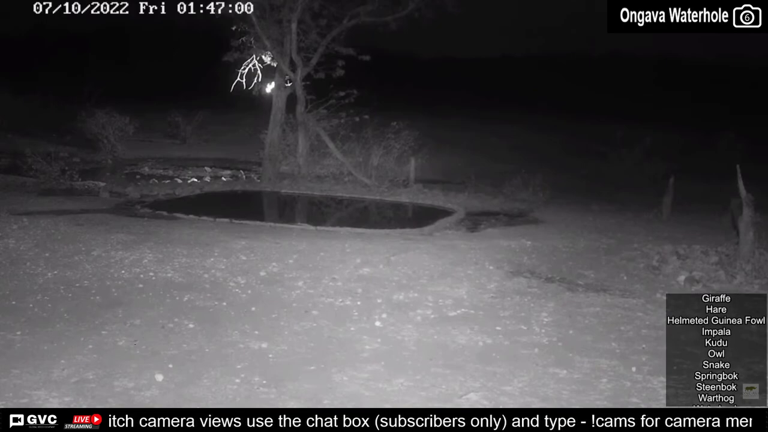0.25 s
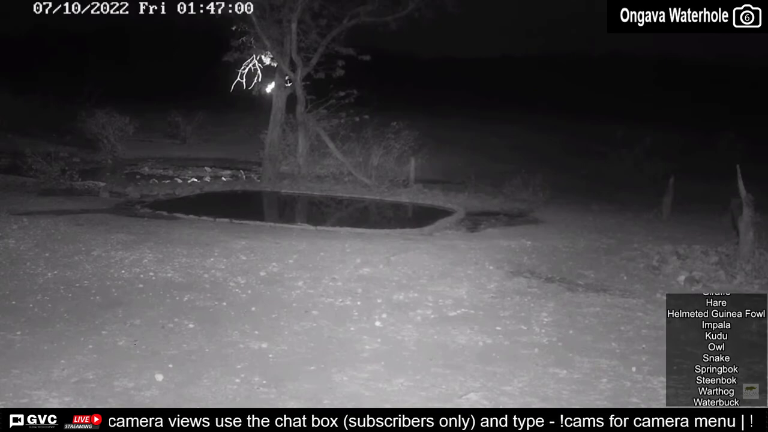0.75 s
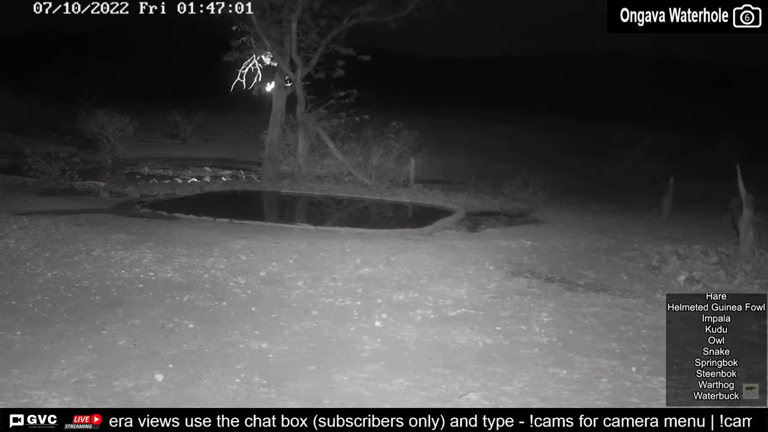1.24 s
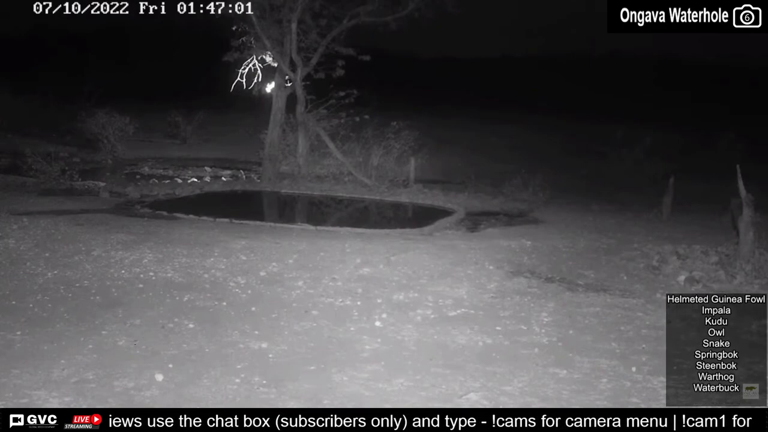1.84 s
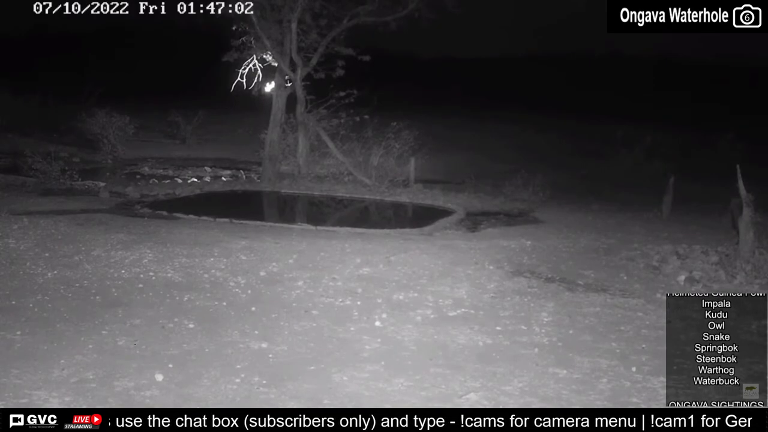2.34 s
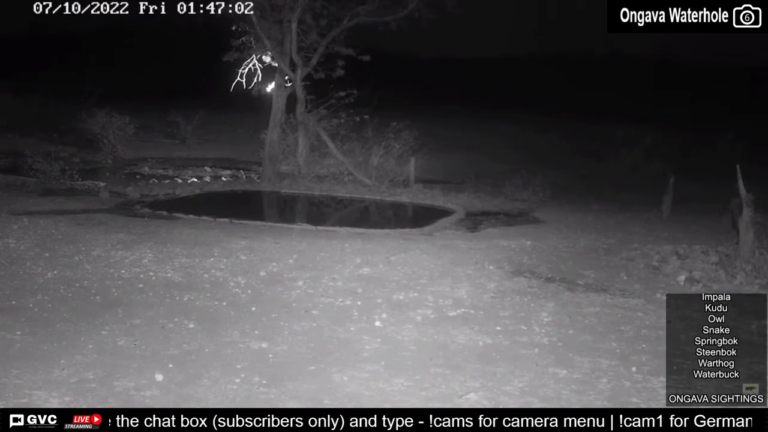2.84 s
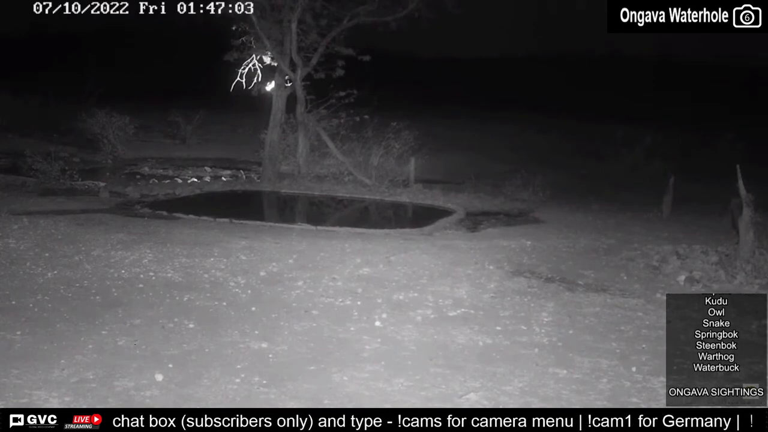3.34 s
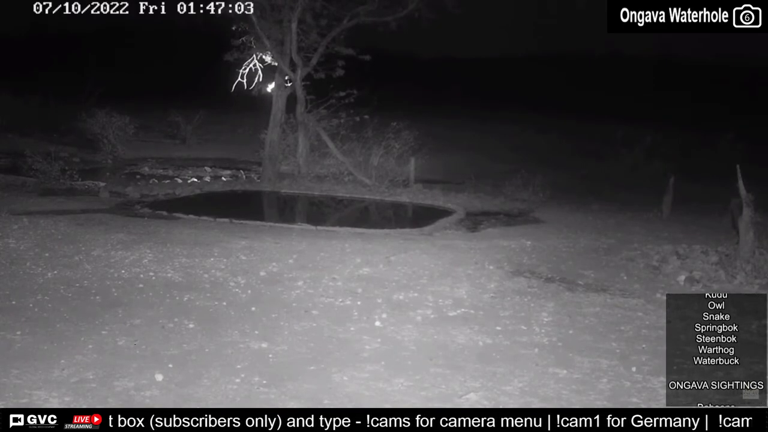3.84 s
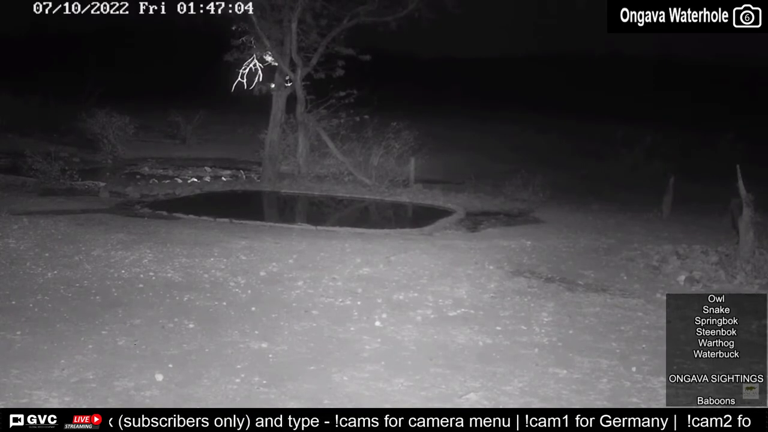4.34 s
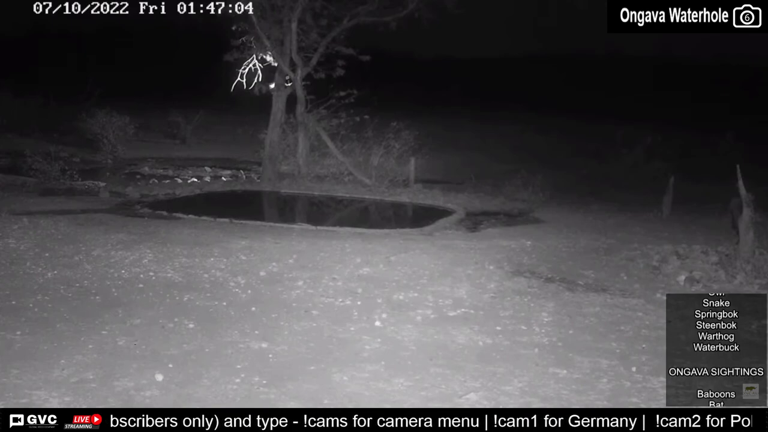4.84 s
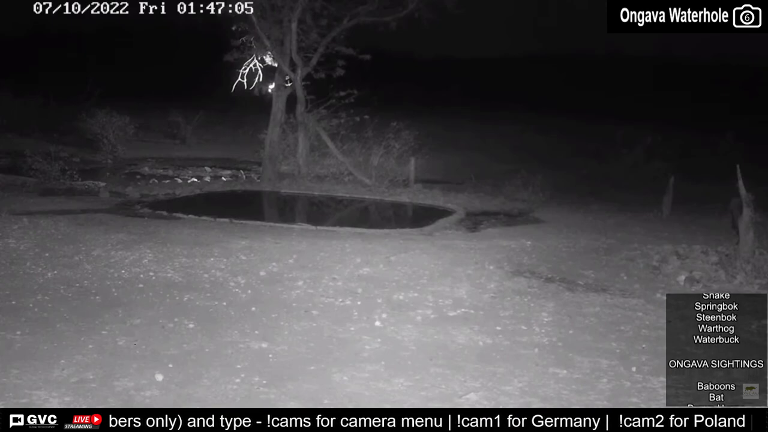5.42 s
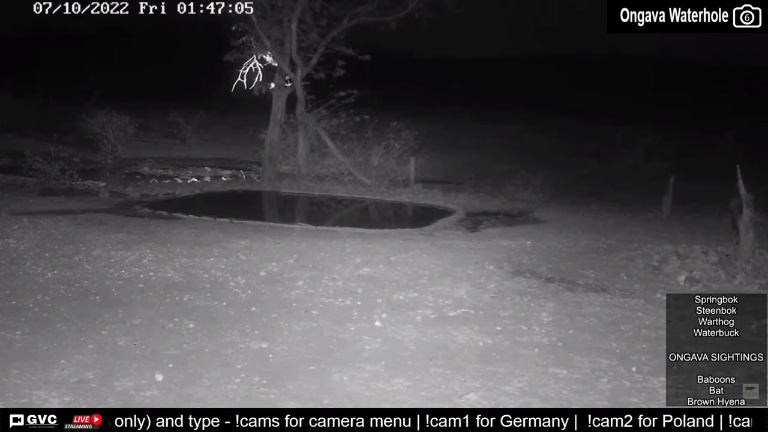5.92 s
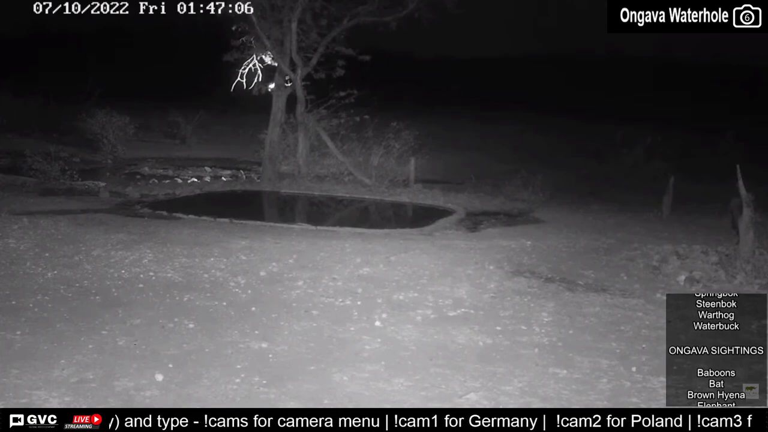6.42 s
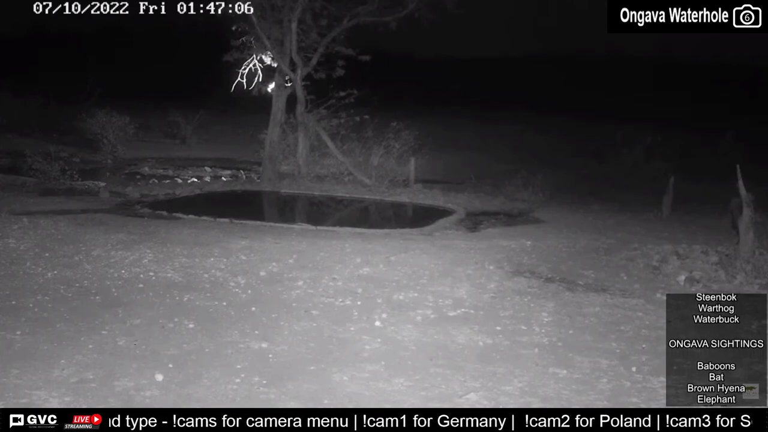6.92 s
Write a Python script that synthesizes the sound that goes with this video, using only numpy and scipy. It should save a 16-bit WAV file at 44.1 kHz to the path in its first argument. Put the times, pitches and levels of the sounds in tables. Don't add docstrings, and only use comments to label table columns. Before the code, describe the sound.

Steady night insect chorus by a pool: continuous purring trill, soft paired chirps about every 0.6 seconds, thin high buzzing and gentle hiss.

```python
import sys
import numpy as np
from scipy import signal
from scipy.fft import rfft, irfft
from scipy.io import wavfile
from scipy.ndimage import uniform_filter1d

SR = 44100
rng = np.random.default_rng(int(sys.argv[2]) if len(sys.argv) > 2 else 0)


def transcribe(u):
    v = np.clip(np.atleast_2d(u).T, -1, 1)
    q = np.round(v * 32767).astype(np.int16)
    wavfile.write(sys.argv[1], SR, q)


def makeup_ratio(level_db):
    decades = np.asarray(level_db, float) / 20
    return 10 ** decades


N = 316312
T = np.arange(N) / SR
END_S = 7.2
FAR_ECHO_DB = -12


def curve(table, column=1):
    points = np.array(table)
    return np.interp(T, points[:, 0], points[:, column])


def walk(rate):
    k = int(SR / rate)
    held = np.repeat(rng.standard_normal(N // k + 1), k)
    return 1.62 * uniform_filter1d(uniform_filter1d(held, k), k)[:N]


def coloured(points, noise, column=1):
    points = np.array(points)
    log_hz = np.log(np.arange(N // 2 + 1) * SR / N + 1)
    db = np.interp(log_hz, np.log(points[:, 0]), points[:, column], left=-200, right=-200)
    return irfft(rfft(noise) * makeup_ratio(db), N) * np.sqrt(SR / 2)


def strokes(mids, db, hz, fall_hz, length, lean=1., blunt=0.8, overtone_db=-60,
            scatter_db=1.5, scatter_hz=15, jitter=.0005):
    out, pad = np.zeros(N + 2 * SR), SR
    u = np.arange(int(length * SR)) / (length * SR)
    shape = np.abs(np.sin(np.pi * u ** lean)) ** blunt
    chance = rng.standard_normal((len(mids), 4))
    for mid, d, f, c in zip(*np.broadcast_arrays(mids, db, hz), chance):
        glide_hz = f + scatter_hz * c[0] - fall_hz * (u ** 2 - 1 / 3)
        phase = 2 * np.pi * np.cumsum(glide_hz) / SR + 9 * c[1]
        tone = np.sin(phase) + makeup_ratio(overtone_db) * (1 - u) ** 2 * np.sin(2 * phase)
        i = pad + int((mid + jitter * c[2] - length / 2) * SR)
        out[i:i + len(u)] += makeup_ratio(d + scatter_db * c[3]) * shape * tone
    return out[pad:pad + N]


def place(x, left_db, right_db, wet_db, t60=0.34):
    t = np.arange(int(.4 * SR)) / SR
    tail = rng.standard_normal((2, len(t))) * np.exp(-np.log(1000) * t / t60)
    tail /= np.sqrt(np.sum(tail ** 2, axis=1, keepdims=True))
    wet = signal.fftconvolve(x[None], tail, axes=1)[:, :N]
    return (x + makeup_ratio(wet_db) * wet) * makeup_ratio(np.array([[left_db], [right_db]]))


def mole_cricket():
    # t/s, wing strokes so far, level/dB
    trill = [(0.0197, 1, -43), (0.4847, 25, -42.5), (0.7179, 37, -41.8), (1.1858, 61, -42.3),
             (1.8899, 97, -43.2), (2.3573, 121, -42.7), (3.5268, 181, -42.4), (3.996, 205, -43.8),
             (4.6989, 241, -42.6), (5.8692, 301, -42.7), (7.0411, 361, -42.7)]
    s, turns, db = np.transpose(trill)
    rate = (turns[-1] - turns[0]) / (s[-1] - s[0])
    k = np.arange(0, int(N / SR * rate) + 2)
    known_turns = np.r_[0, turns, turns[-1] + rate]
    known_s = np.r_[s[0] - 1 / rate, s, s[-1] + 1]
    mids = np.interp(k, known_turns, known_s) - .0003
    song = strokes(mids, np.interp(mids, s, db) + 4.0, 2547.5, 216, length=.0128, lean=1.35, blunt=.75,
                   scatter_db=1., scatter_hz=10, jitter=.0003)
    left = strokes(np.arange(.005, END_S, .0205), -60, 2820, 200, .016,
                   scatter_db=2, scatter_hz=50, jitter=.002)
    right = strokes(np.arange(.009, END_S, .0187), -54.8, 2750, 220, .016,
                    scatter_db=2, scatter_hz=60, jitter=.002)
    far = place(left, .1, -11, FAR_ECHO_DB) + place(right, -6, 0.11, FAR_ECHO_DB)
    return place(song, -1.54, 1.74, -13.5, t60=0.12) + far


def tree_crickets():
    chirp_strokes = [0, .028, .063, .091, .119, .154, .182, .21]
    # t/s, level/dB
    lead_chirps = [(.275, -39.5), (.888, -42.5), (1.484, -40), (2.068, -39), (2.686, -39), (3.27, -39.5),
                   (3.888, -38.5), (4.486, -39.5), (5.108, -39), (5.717, -38), (6.313, -39.5), (6.9, -40)]
    # t/s, level/dB
    answer_chirps = [(.328, -39), (.926, -40.5), (1.5, -44.5), (2.079, -39), (2.699, -38), (3.313, -38.5),
                     (3.949, -39.5), (4.555, -41), (5.135, -39), (5.748, -38.5), (6.379, -42),
                     (6.96, -41.5)]
    # t/s, level/dB
    far_swells = [(0., -48.5), (.42, -43), (.96, -44), (1.6, -42.5), (2.12, -46), (2.75, -40.5),
                  (3.27, -42.5), (3.82, -43), (4.11, -45), (4.47, -44), (4.8, -46), (5.06, -43.5),
                  (5.7, -46), (6.33, -43.5), (6.92, -42)]
    murmur_db, swell_s = -49, 0.07

    grid = np.array(chirp_strokes) + .012
    effort_db = np.interp(grid, [.012, .08, .22], [-2.5, .3, .1])
    near = 0
    for chirps, hz, fall_hz, overtone_db in ((lead_chirps, 1995, 168, -4.5), (answer_chirps, 1955, 142, -18)):
        s, db = np.transpose(chirps)
        mids = (s[:, None] + grid).ravel()
        near = near + strokes(mids, (db[:, None] + effort_db).ravel(), hz, fall_hz, .025,
                              overtone_db=overtone_db)

    s, db = np.transpose(far_swells)
    group = 0
    for hz, period_s in ((1990, .0298), (2010, .0312), (1965, .033), (2005, .0287)):
        mids = np.arange(0, END_S, period_s)
        swell_db = np.exp(-((mids[:, None] - s) / swell_s) ** 2 / 2) @ (db - murmur_db)
        group = group + strokes(mids, murmur_db + swell_db - 5, hz, 152, .024, scatter_db=2.0, jitter=.003)
    return place(near, -44, 0.091, -8.5, t60=0.087) + place(group, -0.079, -45, FAR_ECHO_DB)


def field_crickets():
    # t/s, level/dB
    chirps_of_three = [(.321, -56), (.704, -54), (1.098, -52), (1.521, -58), (1.972, -53.5), (2.36, -53),
                       (2.774, -55), (3.191, -51.5), (3.617, -55), (4.031, -54), (4.485, -56.5),
                       (4.984, -51.5), (5.54, -52), (6.038, -56), (6.445, -54), (6.838, -51.5)]
    # t/s, level/dB
    chirps_of_four = [(-.178, -55), (.187, -53), (.553, -53), (.915, -53), (1.262, -54.5), (1.61, -54),
                      (1.958, -54.5), (2.313, -52.5), (2.664, -54.5), (3.015, -57), (3.382, -53),
                      (3.752, -57), (4.12, -53.5), (4.478, -54), (4.84, -56), (5.187, -53), (5.56, -55),
                      (5.915, -56), (6.281, -52.5), (6.635, -59), (6.98, -55.5)]
    s, db = np.transpose(chirps_of_three)
    mids = s[:, None] + .057 * np.arange(3)
    stroke_db = db[:, None] + [-3.5, -1, -.2]
    threes = strokes(mids.ravel(), stroke_db.ravel(), 4345, 200, .022, blunt=.7)

    s, db = np.transpose(chirps_of_four)
    mids = s[:, None] + .062 * np.arange(4) - .006
    stroke_db = db[:, None] + [-4, -1, -.5, -.5]
    fours = strokes(mids.ravel(), stroke_db.ravel(), 3660, 400, .032, blunt=.6, jitter=.002)

    ticks = np.arange(.046, END_S, .07135)
    ticks_db = np.where((ticks > 2.4) & (ticks < 5.5), -55, -60)
    high = strokes(ticks, ticks_db, 6620, 250, .02, scatter_db=3, scatter_hz=80, jitter=.003)
    low = strokes(np.arange(.045, END_S, .0513), -64.5, 1698, 70, .022, scatter_db=3.5, jitter=0.002116)
    return (place(threes, .5, -3, FAR_ECHO_DB) + place(fours, -1.5, -7, FAR_ECHO_DB)
            + place(high, -10, .5, FAR_ECHO_DB) + place(low, -1.5, .5, FAR_ECHO_DB))


def water():
    # t/s, peak level/dB, f/Hz
    low_blips = [(.37, -62, 740), (.622, -62, 730), (.676, -60, 800), (.919, -60.5, 690), (1.071, -63, 690),
                 (1.586, -56.5, 720), (1.783, -61, 670), (1.88, -57.5, 720), (1.924, -56, 720),
                 (2.045, -58, 704), (2.113, -56.5, 650), (2.727, -60, 720), (2.781, -61.5, 684),
                 (3.18, -62, 754), (3.722, -58, 843), (4.48, -62, 760), (4.612, -61.5, 607),
                 (4.665, -53, 714), (4.779, -60, 640), (5.259, -55, 760), (5.634, -57, 790),
                 (6.157, -59.5, 710), (6.254, -62, 766), (6.678, -51, 720), (7.127, -59, 772)]
    # t/s, peak level/dB, f/Hz
    high_blips = [(.003, -57, 1200), (.282, -59, 1150), (.71, -59, 1125), (.945, -59, 1300),
                  (1.314, -59, 1144), (1.873, -60, 1090), (2.094, -62, 1260), (2.42, -59.5, 1116),
                  (2.864, -56, 1240), (2.899, -59, 1130), (3.073, -61, 1290), (3.21, -55.5, 1260),
                  (3.883, -60, 1210), (3.938, -63, 1250), (4.344, -59, 1240), (4.421, -59, 1220),
                  (4.552, -60, 1270), (4.664, -58, 1150), (4.916, -61, 1290), (5.023, -60, 1190),
                  (5.609, -63, 1200), (6.121, -58.5, 1315), (6.519, -57, 1270), (6.634, -59, 1360),
                  (7.035, -59, 1180)]
    # t/s, peak level/dB, f/Hz
    deep_blips = [
        (3.57, -60, 563),
        (3.72, -68, 523),
        (3.87, -68, 510),
        (4.01, -62.5, 430),
        (4.249, -64, 530),
        (4.67, -62, 521),
        (4.76, -66, 510),
    ]
    low = strokes(*np.transpose(low_blips), -94, 0.01984, scatter_hz=6.9, scatter_db=2.3)
    low += strokes(*np.transpose(deep_blips), -63, .03, lean=0.6, scatter_hz=5.0, scatter_db=2.0)
    high = strokes(*np.transpose(high_blips), -120, .018, lean=0.97, scatter_hz=3.5, scatter_db=0.7)
    high += strokes([4.732], -48, 3300, 600, .003)
    faint = np.arange(.1, END_S, .22)
    low += strokes(faint, -63, 717, -90, 0.01993, scatter_hz=55, scatter_db=1.3, jitter=.07)
    high += strokes(faint, -63, 1220, -120, .018, scatter_hz=55, scatter_db=1.3, jitter=.07)
    return place(low, -0.4, 0.33, FAR_ECHO_DB) + place(high, -1.6, 1.6, FAR_ECHO_DB)


def katydids():
    # t/s, level/dB
    effort = [(0, -51.7), (.4, -51.5), (.85, -50), (1.2, -51), (1.8, -51), (2.8, -52), (3, -50),
              (3.3, -52.5), (4.05, -53.3), (4.4, -49.5), (4.7, -51.5), (5, -52.9), (5.6, -51), (6.4, -51),
              (7.17, -52)]
    # f/Hz, left level/dB, right level/dB
    buzz = [(6660, -34, -18), (7110, -7, -7), (7430, -7.5, 2.5), (8640, -2.5, -4), (8650, -5, -3),
            (10200, -1, -1), (11400, -0.6, -0.5), (12400, -5, -10), (13640, -9, -11), (14400, -14.5, -15),
            (15300, -16, -10)]
    # middle t/s, half length/s, rise/dB
    right_rasps = [
        (5.725, .04, 4.5),
        (5.835, .04, 7),
    ]
    rasp = np.array([coloured(buzz, rng.standard_normal(N), column=c) for c in (1, 2)])
    slow_phase = 2 * np.pi * np.cumsum(86 + 1.43 * walk(3.2)) / SR
    fast_phase = 2 * np.pi * np.cumsum(171 + 3 * walk(3)) / SR
    teeth = 1 + 0.1 * np.sin(slow_phase) + 0.14 * np.sin(fast_phase)
    left_db = curve(effort)
    right_db = -62.5 + .3 * (left_db - left_db.mean()) + .4 * walk(1.5)
    for s, half_s, rise_db in right_rasps:
        right_db = right_db + rise_db * np.exp(-((T - s) / half_s) ** 2)
    db = np.array([side + 0.5 + .6 * walk(9) for side in (left_db, right_db)])
    return rasp / rasp.std(axis=1, keepdims=True) * teeth * makeup_ratio(db)


def air_hiss():
    # f/Hz, left level/dB per Hz, right level/dB per Hz
    air = [(40, -101, -95), (70, -92.5, -99), (153, -96.5, -94), (376, -99, -99), (530, -99, -99),
           (720, -93, -91.5), (980, -100, -99), (1150, -95, -93), (1460, -99, -96.5), (2490, -84, -82),
           (2980, -99.5, -86.5), (3540, -110, -110)]
    shared, own = rng.standard_normal(N), rng.standard_normal((2, N))
    shared = signal.sosfilt(signal.butter(1, 350, "high", fs=SR, output="sos"), shared)
    like = 0.58
    sides = []
    for c in range(2):
        noise = np.sqrt(like) * shared + np.sqrt(1 - like) * own[c]
        sides.append(coloured(air, noise, column=c + 1) * makeup_ratio(1.3 * walk(13)))
    return np.array(sides)


def far_chorus():
    # f/Hz, left level/dB per Hz, right level/dB per Hz
    chorus = [(2660, -100, -106), (3290, -92.5, -90), (3850, -92.5, -91.5), (4685, -90.5, -88.5),
              (5130, -82.5, -81), (5500, -83, -85.5), (5810, -91, -85.5), (6740, -90, -93.5),
              (7200, -101, -104), (7530, -115, -110)]
    sides = []
    for c in (1, 2):
        flutter_db = 0.41 * walk(9) + 0.59 * walk(20)
        sides.append(coloured(chorus, rng.standard_normal(N), column=c) * makeup_ratio(flutter_db))
    return np.array(sides)


def wind():
    # t/s, level/dB
    gusts = [
        (0.0, -74),
        (0.34, -62),
        (0.56, -65.5),
        (4.27, -68),
        (5.49, -65),
        (5.65, -60.5),
        (7.17, -66),
    ]
    noise = rng.standard_normal((2, N))
    rumble = coloured([(8, -4), (22, -4.0), (36, -13.5), (55, -33), (70, -46)], noise + 0.1 * noise[::-1])
    return rumble / rumble.std() * makeup_ratio(curve(gusts) + np.array([[5], [.5]])) * [[1], [-1]]


def hum():
    return makeup_ratio(-87) * np.sin(2 * np.pi * 122 * T + 0.47 * np.cumsum(walk(17)) / 300)


def weak_bands_drop_out(x):
    # f/Hz, level/dB
    drops = [(2900, -9), (3200, -4.5), (4500, -4.5), (4900, -8), (6400, -5), (6900, .2), (7400, 1),
             (7800, -5), (12000, -5), (13500, -2), (14400, -.5), (14800, 2), (15600, 3.5)]
    hz, _, z = signal.stft(x, SR, nperseg=2048)
    band = 9
    power = uniform_filter1d(np.abs(z) ** 2, size=band, axis=1)
    power = power[:, np.arange(len(hz)) // band * band] + 1e-18
    rel_db = 10 * np.log10(power / power.mean(axis=2, keepdims=True))
    treble_db = rel_db[:1, (hz > 8000) & (hz < 13000)].mean(axis=1, keepdims=True)
    masker_db = uniform_filter1d(treble_db, size=9, axis=2)
    limit_db = np.interp(hz, *np.transpose(drops), left=-99)[:, None]
    side_db = np.reshape([0, .8], (2, 1, 1))
    limit_db = limit_db + (hz > 6000)[:, None] * (masker_db + side_db)
    return signal.istft(z * (rel_db > limit_db), SR, nperseg=2048)[1][:, :N]


def scene():
    insects = mole_cricket() + tree_crickets() + field_crickets()
    return insects + water() + katydids() + air_hiss() + far_chorus() + wind() + hum()


def band_limit(x):
    return signal.sosfilt(signal.butter(12, 15700, fs=SR, output="sos"), x)


def record(dry):
    mix = weak_bands_drop_out(dry)
    return band_limit(mix)


dry = scene()
out = record(dry)
transcribe(out)
```